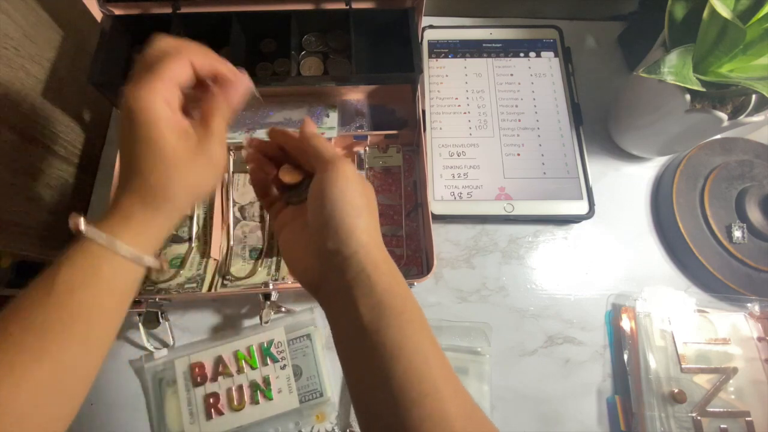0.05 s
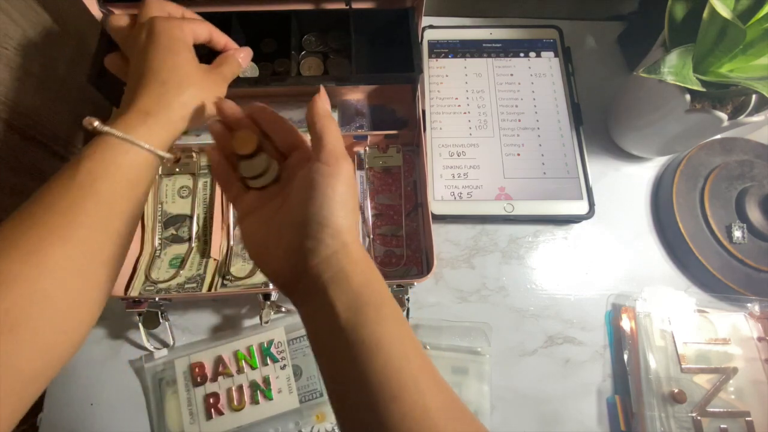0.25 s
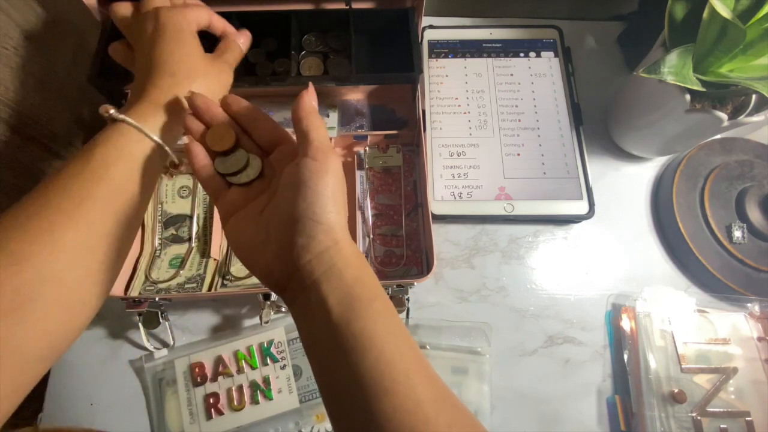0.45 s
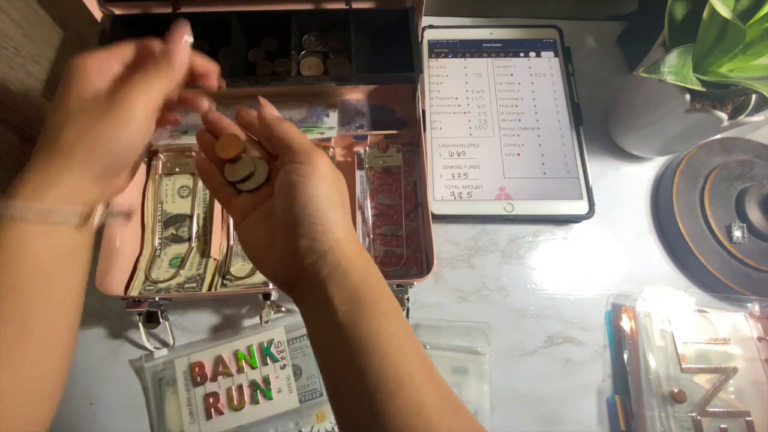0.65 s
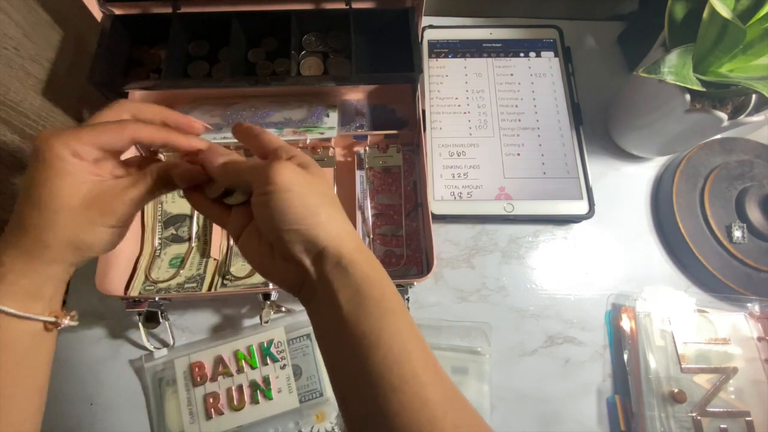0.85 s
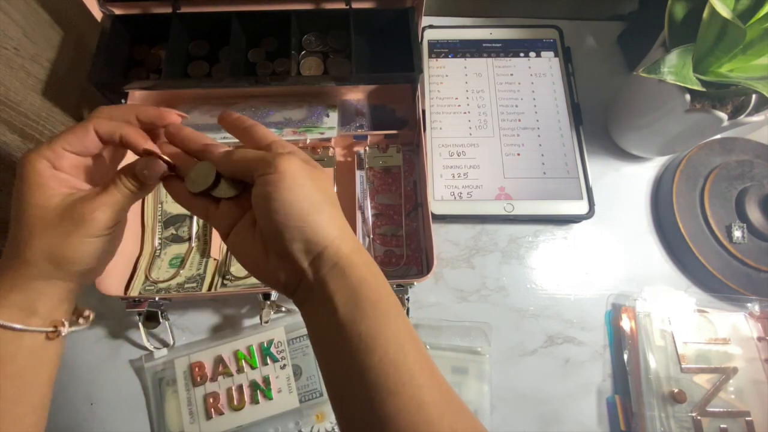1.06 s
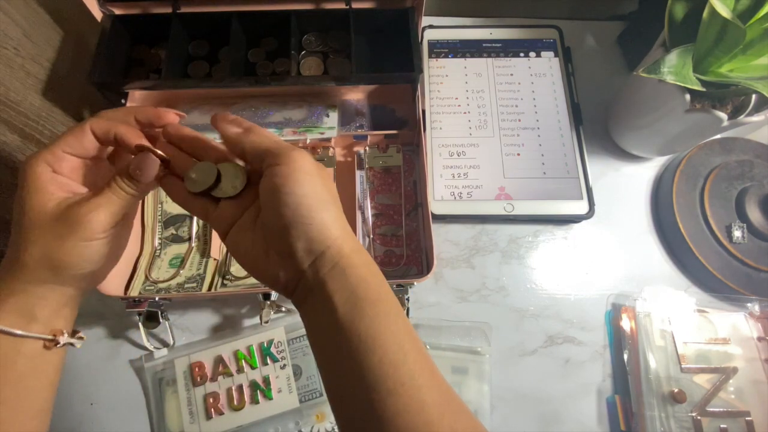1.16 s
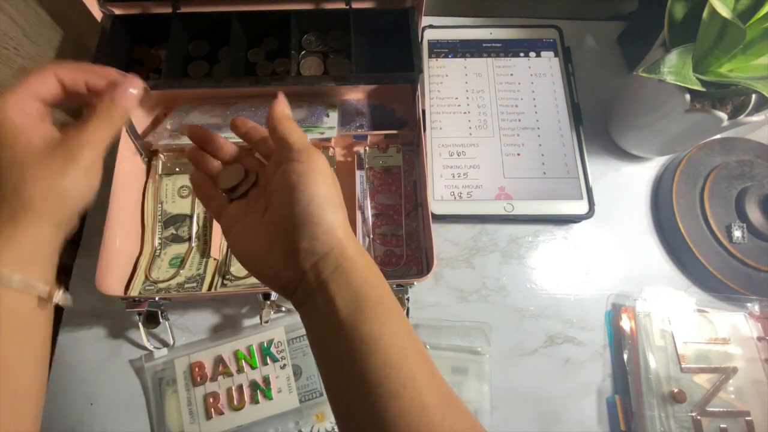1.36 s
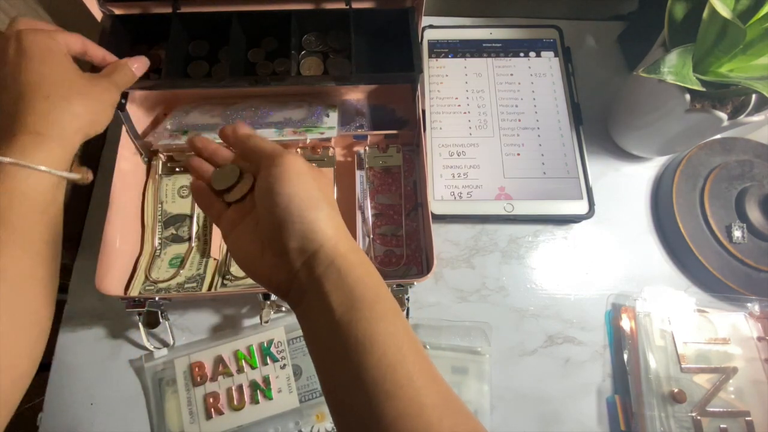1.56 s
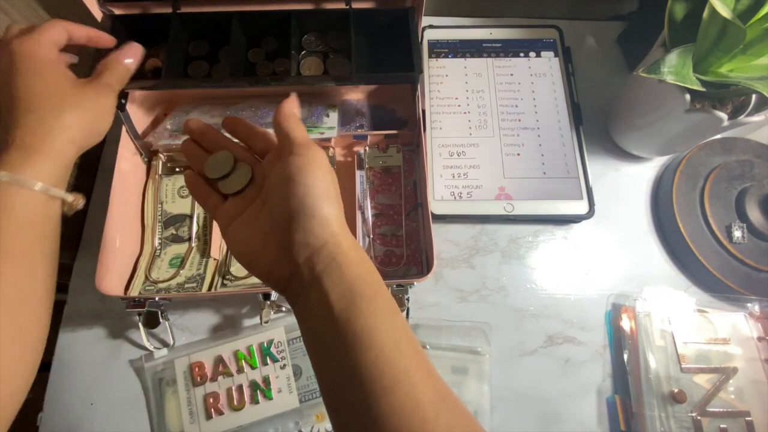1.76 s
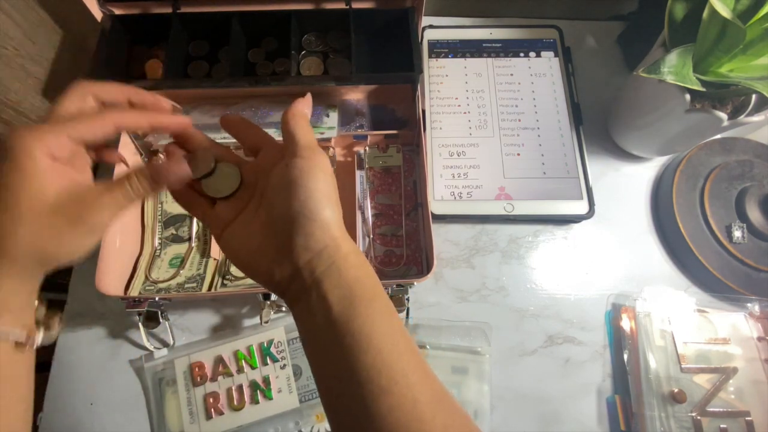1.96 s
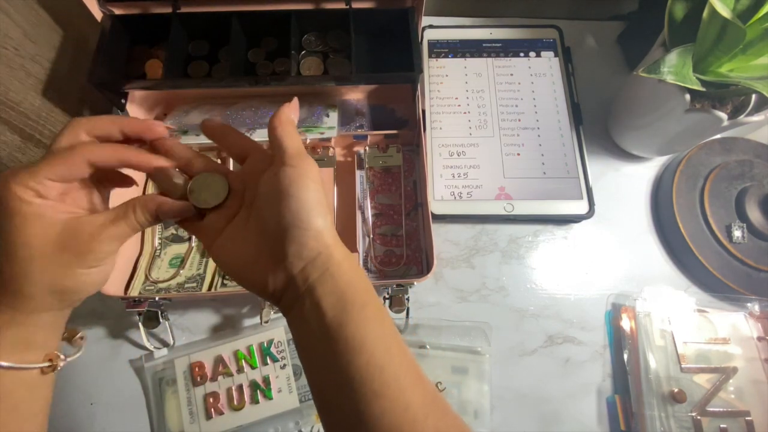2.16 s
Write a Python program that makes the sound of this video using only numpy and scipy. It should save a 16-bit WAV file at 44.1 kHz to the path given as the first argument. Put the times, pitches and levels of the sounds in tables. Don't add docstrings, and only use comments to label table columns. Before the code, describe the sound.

A small handful of coins cracks and rattles into a plastic tray, coins shift softly in a hand, then another handful lands with more bounces and a brief metal box ring, close up in a quiet room.

```python
import sys
import numpy as np
from scipy import signal
from scipy.fft import rfft, irfft
from scipy.io import wavfile
from scipy.ndimage import uniform_filter1d

SR = 44100
rng = np.random.default_rng(int(sys.argv[2]) if len(sys.argv) > 2 else 0)


def decibels_to_gain(level_db):
    exponent = np.asarray(level_db, float) / 20
    return 10 ** exponent


def materialize(psi):
    bounded = np.clip(np.atleast_2d(psi).T, -1, 1)
    quanta = np.round(bounded * 32767).astype(np.int16)
    wavfile.write(sys.argv[1], SR, quanta)


N = 97020

# frequency in Hz, density in dB per Hz.
CRACK_SPECTRUM = [(120, -45), (200, -16.5), (1970, 0), (2600, -3), (3630, 7), (12500, -10.5),
                  (13700, -29.5), (15000, -42), (16500, -43.5)]


def evened(x):
    return x / np.sqrt(np.mean(x ** 2) + 1e-20)


def read(points, hz):
    f, value = np.transpose(points)
    return np.interp(np.log(hz + 1), np.log(f + 1), value)


def add(mix, s, sound):
    part = mix[..., round(s * SR):][..., :sound.shape[-1]]
    part += sound[..., :part.shape[-1]]


def coloured(points, size):
    white = rfft(rng.standard_normal((2, size)))
    gain = decibels_to_gain(read(points, np.fft.rfftfreq(size, 1 / SR)))
    return evened(irfft(white * gain, size))


def ring(modes, t, spread_db, detune):
    hz, db, t60 = np.transpose(modes)[:, :, None]
    strength, tuning, phase = rng.standard_normal((3, len(modes), 1))
    decay = decibels_to_gain(db + spread_db * strength - 60 * t / np.abs(t60))
    return (decay * np.sin(2 * np.pi * hz * (1 + detune * tuning) * t + phase)).sum(0)


def pair(x, other):
    unlike = 0.3 * other
    return np.array([x + unlike, x - unlike])


def stroke(rows):
    out = np.zeros(N)
    for s, length, db in rows:
        progress = np.linspace(0, 1, round(length * SR))
        add(out, s, decibels_to_gain(db) * np.sin(np.pi * progress ** .6) ** 1.5)
    return out


def grains(per_s, spread_db, t60):
    strength = decibels_to_gain(spread_db * np.minimum(rng.exponential(1, N), 4))
    knocks = strength * (rng.random(N) < per_s / SR)
    decay = decibels_to_gain(-60 * np.arange(2000) / SR / t60)
    return evened(signal.oaconvolve(knocks, decay)[:N] + .15)


def air():
    # frequency in Hz, density in dB per Hz.
    rumble = [(12, -61), (25, -30), (65, -4.5), (234, -13.5), (434, -20.5), (472, -22.5), (542, -27),
              (590, -34), (16000, -52)]
    # frequency in Hz, left-right likeness from 0 to 1.
    likeness = [(100, 1), (400, 0.39), (2400, 0.093)]
    # time in seconds, level in dB.
    hum_level = [(0, -67), (1.2, -66.5), (1.42, -55), (2.2, -52.5)]
    rumble_db, hum_hz, wander_hz = -62.5, 153, 0.37
    a, b = rfft(coloured(rumble, size=N))
    same = np.clip(read(likeness, np.fft.rfftfreq(N, 1 / SR)), -1, 1)
    wash = decibels_to_gain(rumble_db) * irfft(np.array([a, same * a + np.sqrt(1 - same ** 2) * b]), N)
    t = np.arange(N) / SR
    wander = wander_hz * evened(uniform_filter1d(rng.standard_normal(N), size=3000))
    turn = 2 * np.pi * np.cumsum(hum_hz + wander) / SR
    hum = 0.86 * np.sin(turn) + 0.12 * np.sin(turn / 2)
    return wash + decibels_to_gain(np.interp(t, *np.transpose(hum_level))) * hum


def hand():
    # start in seconds, peak level in dB, strongest ring in Hz, free ring level in dB.
    clinks = [(0.0568, -57, 10000, -10), (0.1092, -49, 5100, -15), (0.1164, -48, 5220, -18),
              (0.137, -67, 9300, -22), (0.1706, -49.5, 9300, -26), (0.6625, -51.5, 9950, -24.5),
              (0.8109, -35.5, 10240, -10.5), (0.8145, -40, 8500, -12), (0.8169, -27.5, 9380, -22.5),
              (0.8204, -30.5, 5520, -22), (0.826, -36, 11390, -23), (0.842, -50, 9700, -23),
              (0.8548, -39, 10970, -29), (0.8611, -26.5, 11330, -25), (0.869, -32.5, 12030, -23),
              (0.939, -51, 10660, -19.5), (0.9544, -40, 12450, -17.5), (0.9592, -32.5, 10360, -13),
              (0.972, -44, 11230, 6), (0.9949, -38, 9440, -8), (1.008, -42, 6270, -15),
              (1.0166, -39, 5870, -2), (1.052, -50.5, 5330, -15), (1.0604, -44, 9200, -10),
              (1.272, -58, 5870, -15), (1.2782, -37, 9320, -19), (1.2815, -33.5, 10640, -12.5),
              (1.2971, -27, 10700, -18), (1.308, -50.5, 9200, -12), (1.367, -62, 5460, -17),
              (1.391, -48, 9630, -3), (1.441, -52, 5210, -24), (1.5032, -54.5, 9030, -8),
              (2.0646, -50, 11000, -28), (2.0668, -20, 9080, -29.5), (2.0774, -30.5, 9240, -31.5),
              (2.124, -40, 8960, -19.5)]
    # frequency in Hz, level in dB, 60 dB decay time in seconds.
    coin_modes = [(5990, -9, .07), (9250, -8, 0.06), (10900, -5, 0.2), (15800, 9, 0.08)]
    # start in seconds, length in seconds, level in dB.
    rubs = [
        (.05, 0.27, -65.5),
        (.81, 0.13, -55.5),
        (.93, 0.18, -57.5),
        (1.26, 0.095, -57.5),
        (1.34, .15, -56),
        (1.44, 0.27, -67),
    ]
    # frequency in Hz, density in dB per Hz.
    rub_spectrum = [(1180, -52), (2000, -33.5), (4470, -9), (5140, 2.5), (7860, 0.5), (11200, -10),
                    (13600, -29.5), (15800, 4.5), (16500, -36.5)]
    tick_spectrum = [(1000, -35), (2000, -18.5), (5500, -2), (7500, 7.5), (11000, -2.3), (13500, -5.5),
                     (16000, -4)]
    out, t = np.zeros((2, N)), np.arange(5000) / SR
    for s, db, hz, free_db in clinks:
        tick = coloured(tick_spectrum, size=5000) * decibels_to_gain(-60 * t / 0.0095)
        free = [(f, d + free_db - 40 * abs(np.log2(f / hz)), t60) for f, d, t60 in coin_modes]
        tone = ring(free, t, spread_db=3.0, detune=.004)
        tone = tone + ring([(hz, 0, .018)] * 3, t, 0, detune=.03)
        x = (2.3 * tick + tone) * np.minimum(t / 0.00065, 1)
        add(out, s, decibels_to_gain(db) * pair(x[0], tick[1]) / abs(x[0]).max())
    smooth = grains(per_s=600, spread_db=1.8, t60=.03)
    return out + pair(*coloured(rub_spectrum, size=N) * smooth * stroke(rubs))


def rattle():
    # start in seconds, length in seconds, level in dB.
    shivers = [
        (.226, 0.01, -45),
        (.245, 0.13, -51.5),
        (.341, 0.014, -37),
        (.36, .16, -27),
        (1.55, 0.026, -46),
        (1.65, 0.19, -30.5),
        (1.79, 0.15, -39.5),
        (1.87, 0.058, -41.5),
    ]
    knocks = grains(per_s=350, spread_db=1.6, t60=.03)
    return pair(*coloured(CRACK_SPECTRUM, size=N) * knocks * stroke(shivers))


def clack(db, hz, treble_db, bright_db, tray):
    t = np.arange(6000) / SR
    modes = [(f, d + bright_db * np.log2(f / 2500), np.clip(5.8 / width, .015, .05)) for f, width, d in tray]
    body = []
    for _ in range(2):
        plastic = evened(ring(modes, t, spread_db=4.0, detune=.015))
        spot = evened(ring([(hz, 0, .03)], t, 0, 0))
        body.append(plastic + .8 * spot)
    tilted = [(f, d + bright_db * np.log2(max(f, 1200) / 2500)) for f, d in CRACK_SPECTRUM]
    decay = decibels_to_gain(-60 * t / 0.036) + decibels_to_gain(-11.5 - 60 * t / 0.17)
    crack = evened(coloured(tilted, size=6000) * decay)
    low = (np.array(body) + 1.495 * crack) * np.minimum(t / .0012, 1)
    jingle = [(f, -0.18 * f / 1e3, .035) for f in np.linspace(7600, 15900, num=40)]
    high = np.array([ring(jingle, t, spread_db=5.0, detune=.015) for _ in range(2)])
    high = high * np.minimum(t / .0006, 1)
    out = low / abs(low[0]).max() + decibels_to_gain(treble_db + 2.0) * high / abs(high[0]).max()
    return decibels_to_gain(db) * pair(*out)


def drops():
    # start in seconds, peak level in dB,
    # strongest ring in Hz, treble level in dB, brightness in dB per octave.
    first_hits = [(0.2349, -14, 3070, -20, -2), (0.2385, -16, 1895, -23.5, -6.5),
                  (0.2476, -23.5, 1860, -35.5, -6.8), (0.2995, -29, 3150, -29, -5.14),
                  (0.3518, -4, 2050, -17.5, 2.4), (0.378, -3.5, 2037, -16.5, -1.9),
                  (0.3959, -5, 3610, -7.5, 7.5), (0.412, -21, 4600, -4, -1.8),
                  (0.4342, -12, 3580, -3.5, 1.9), (0.4443, -9, 3284, -9.5, 0.9),
                  (0.4618, -24.5, 3850, 0, 1.5), (0.4807, -15.5, 3780, -15, 1.1),
                  (0.4965, -30, 3700, -22.5, -2)]
    second_hits = [(1.5265, -28, 3400, -45, -5), (1.5353, -2.5, 3167, -22, 0.5),
                   (1.5478, -6.5, 3820, -18, -5.6), (1.5545, -17, 2050, -26.5, -0.4),
                   (1.5774, -18.5, 1930, -20.5, -12.5), (1.6229, -23.5, 3650, -8, -2.4),
                   (1.6304, -3, 3590, -11.5, 1.8), (1.6445, -3.5, 5390, -9.5, -0.7),
                   (1.6805, -14.5, 2020, -20, 3.3), (1.691, -16.5, 3690, -22.5, -6),
                   (1.7055, -38, 5700, -6.5, 14.8), (1.7109, -11.5, 2165, -7, 2),
                   (1.7259, -9.5, 3540, -14, -1.9), (1.7455, -11.5, 1907, -26, -1.1),
                   (1.7575, -9.5, 5830, -13, -0.2), (1.7655, -20, 3630, -19, -0.7),
                   (1.766, -26.5, 320, -27.5, 7), (1.8057, -20, 2260, -13, 1.9),
                   (1.8495, -25, 3610, -23.5, -13), (1.8582, -5.5, 3797, -18, 3),
                   (1.8612, -7, 3645, -35, -0.2), (1.8796, -9.5, 3530, -24, 0.5),
                   (1.8915, -29, 3700, -14, -15), (1.915, -9, 3593, -23, 0.7),
                   (1.9324, -16, 3530, -40, -2.2), (1.942, -27, 1800, -12.5, -4)]
    # frequency in Hz, bandwidth in Hz, level in dB.
    first_tray = [(606.6, 80, -4), (1100, 200, 1.5), (1703, 27, 7.5), (2050, 110, 7.5), (3440, 52, -18),
                  (3700, 57, -14), (3960, 32, -16.5), (4800, 27, 1), (5370, 160, 1), (5860, 110, 12)]
    second_tray = [(955, 31, -13), (1825, 330, 8), (3310, 52, -12.5), (3530, 37, 3.5), (3820, 69, -5.5),
                   (4380, 70, -16.5), (4580, 140, -12.5), (4760, 51, 2.5), (5390, 39, 4)]
    out = np.zeros((2, N))
    for hits, tray in (first_hits, first_tray), (second_hits, second_tray):
        for s, *hit in hits:
            add(out, s, clack(*hit, tray))
    return out


def desk():
    # frequency in Hz, level in dB, 60 dB decay time in seconds.
    desk_modes = [(113.3, -46, 0.35), (135.6, -48, 0.47)]
    # frequency in Hz, level in dB, 60 dB decay time in seconds.
    panel_modes = [(295, -48.5, 0.22), (400, -48, 0.23), (640, -47, 0.12), (988, -34.5, 0.19),
                   (1250, -45.5, 0.26), (1630, -42.5, 0.56), (3150, -41.5, 0.34)]
    # start in seconds, desk level in dB, panel level in dB.
    blows = [
        (0.24, 15, -2),
        (0.412, 0, -15.5),
        (0.619, -7, -31.5),
        (1.539, 6, -4),
        (1.641, 5, -4),
        (1.741, 0, -5.5),
        (1.859, 0.5, -13),
    ]
    out, t = np.zeros(N), np.arange(SR // 2) / SR
    for s, db, panels_db in blows:
        buzz = ring(panel_modes * 4, t, spread_db=3.0, detune=.035) * np.minimum(t / .004, 1)
        thump = ring(desk_modes, t, spread_db=.8, detune=.005) * np.minimum(t / .018, 1)
        add(out, s, decibels_to_gain(db) * thump + decibels_to_gain(panels_db) * buzz)
    return out * decibels_to_gain([[-1.5], [0]])


def box():
    # frequency in Hz, level in dB, 60 dB decay time in seconds.
    box_modes = [(462, -51.5, 2.8), (956, -54.5, 0.49), (1631, -43.5, 1.03), (1922, -61, .39)]
    # start in seconds, level in dB, share of the free ring time.
    blows = [
        (1.538, 16, 0.13),
        (1.645, 8.5, .25),
        (1.727, -4, 0.32),
        (1.86, -0.5, 0.61),
        (1.955, -2, 0.3),
    ]
    out, t = np.zeros(N), np.arange(SR) / SR
    for s, db, free in blows:
        modes = [(f, d + db, t60 * free) for f, d, t60 in box_modes]
        beating = ring(modes, t, 0, 0) + 0.29 * ring(modes, t, 0, detune=0.015)
        add(out, s, beating * np.minimum(t / 0.024, 1))
    return np.array([out, out])


def room(x):
    # frequency in Hz, 60 dB decay time in seconds.
    room_decay = [(1800, 0.81), (5000, 0.68), (13000, 0.99)]
    # frequency in Hz, level in dB.
    room_tone = [(500, -3), (1620, 1.5), (2100, -7), (3700, -7), (5800, -3), (7000, .1), (11500, -6),
                 (13000, -20), (16000, -26)]
    hz, t, z = signal.stft(rng.standard_normal((2, SR)), SR, nperseg=256)
    level = decibels_to_gain(-60 * t / read(room_decay, hz)[:, None] + read(room_tone, hz)[:, None])
    tail = signal.istft(z * level, SR, nperseg=256)[1]
    tail = pair(*tail) * np.minimum(np.arange(tail.shape[1]) / SR / 0.013, 1)
    return signal.fftconvolve(x.mean(0)[None], tail / np.linalg.norm(tail[0]), axes=1)[:, :N]


def ports(x, lean):
    # frequency in Hz, lead in radians.
    phase_lead = [(100, 0), (690, -1), (1550, .6), (5400, 1.6), (7750, 3.14), (10500, 6), (13700, 9.42),
                  (16600, 13)]
    # frequency in Hz, difference in dB.
    level_lean = [(60, 0), (330, -10), (700, -6), (1400, -2.5), (2800, -4), (15000, 0)]
    hz = np.fft.rfftfreq(N, 1 / SR)
    half = np.exp(.5j * read(phase_lead, hz)) * decibels_to_gain(lean * read(level_lean, hz) / 2)
    return irfft(rfft(x) * np.array([half, 1 / half]), N)


def thinned(x):
    spared_db, faint_db = -35, -109
    z = signal.stft(np.array([x[0] + x[1], x[0] - x[1]]), nperseg=1022)[2]
    bands = (abs(z) ** 2).reshape(2, 32, 16, -1).mean(2)
    loudest = bands[:, 1:].max((0, 1))
    kept = bands > decibels_to_gain(2 * spared_db) * loudest + decibels_to_gain(2 * faint_db)
    kept[:, :10] = True
    mid, side = signal.istft(z * np.repeat(kept, 16, axis=1), nperseg=1022)[1][:, :N]
    return np.array([mid + side, mid - side]) / 2


def scene():
    tray, palm = drops() + box() + rattle(), hand()
    near_tray = ports(tray + decibels_to_gain(-26) * room(tray + palm), lean=1.0)
    return near_tray + ports(palm, lean=.15) + desk() + air()


def band_limit(x):
    return signal.sosfilt(signal.butter(12, 17030, fs=SR, output="sos"), x)


def record(dry):
    edge_hz = 16100
    top = signal.firwin2(255, [0, edge_hz - 200, edge_hz, edge_hz + 800, SR / 2], [1, 1, .03, 0, 0], fs=SR)
    limited = signal.oaconvolve(thinned(dry), top[None], "same")
    return band_limit(np.clip(limited, -.96, .96))


dry = scene()
out = record(dry)
materialize(out)
```